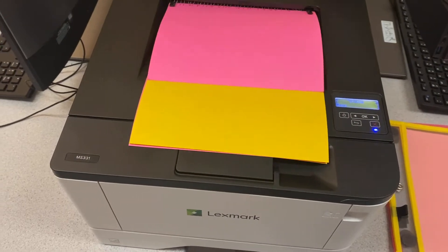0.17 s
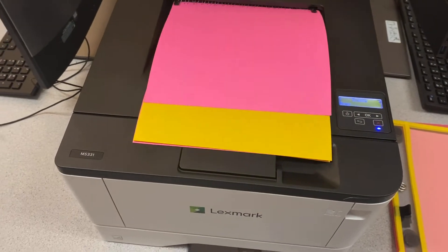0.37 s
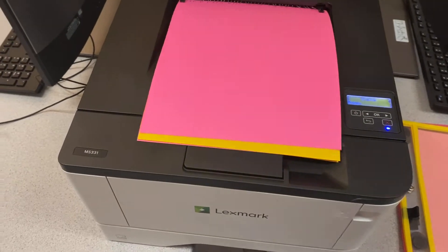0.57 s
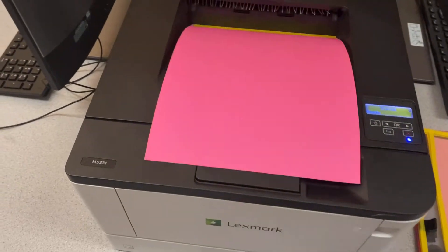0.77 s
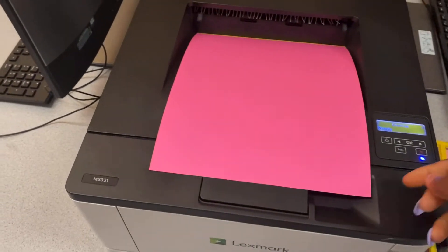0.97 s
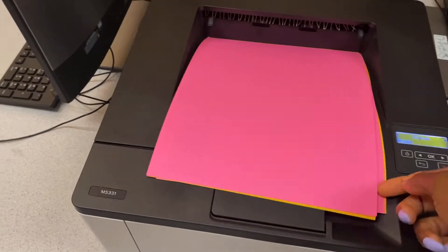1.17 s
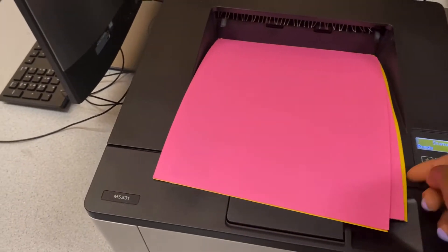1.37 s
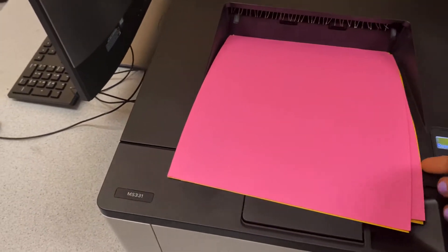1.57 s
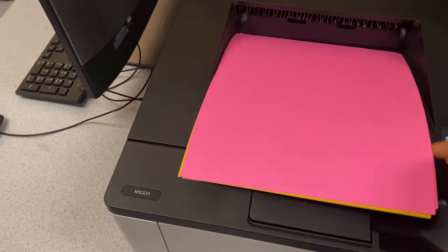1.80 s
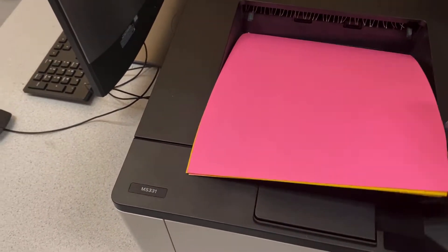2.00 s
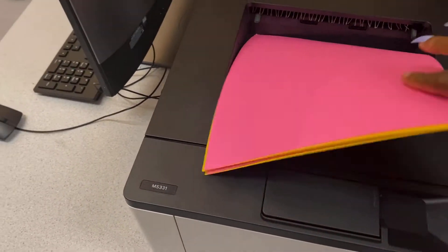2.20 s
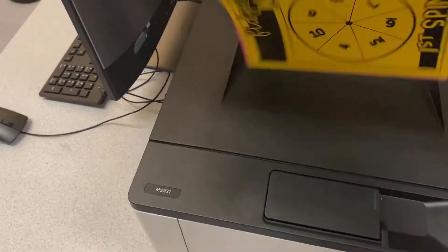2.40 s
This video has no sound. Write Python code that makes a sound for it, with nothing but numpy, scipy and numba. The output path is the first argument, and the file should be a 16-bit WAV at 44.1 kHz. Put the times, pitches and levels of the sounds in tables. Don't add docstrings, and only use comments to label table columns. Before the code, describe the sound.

A printer clunks twice, its motor coasts down with a thin whine, and sheets rustle and pop

```python
import sys
import numpy as np
from scipy import signal
from scipy.fft import rfft, irfft, next_fast_len
from scipy.io import wavfile
from scipy.ndimage import uniform_filter1d
from numba import njit

SR = 44100
rng = np.random.default_rng(int(sys.argv[2]) if len(sys.argv) > 2 else 0)


def invert_db(level):
    return 10 ** (np.asarray(level, dtype=float) / 20)


def log_audio(samples):
    frames = np.atleast_2d(samples).T
    limited = np.clip(frames, -1, 1)
    pcm = np.round(limited * 32767).astype(np.int16)
    wavfile.write(sys.argv[1], SR, pcm)


N = 107912
T = np.arange(N) / SR


def level(x, db):
    return x * invert_db(db) / np.sqrt(np.mean(x ** 2))


@njit
def svf(x, hz, width):
    y, b, l = np.empty(len(x)), 0., 0.
    g, k = np.tan(np.pi * hz / SR), width / hz
    for i in range(len(x)):
        v = (b + g * (x[i] - l)) / (1 + g * (g + k))
        b, l, y[i] = 2 * v - b, l + 2 * g * v, k * v
    return y


def resonance(x, hz, width):
    return svf(svf(x, 1. * hz, 1. * width), 1. * hz, 1. * width)


def decay(t, t60):
    return 1000. ** (-t / t60)


def walk(rate):
    k = int(SR / rate)
    steps = np.repeat(rng.standard_normal(N // k + 1), k)
    return 1.097 * uniform_filter1d(uniform_filter1d(steps, k), k)[:N]


def curve(table):
    return np.interp(T, [r[0] for r in table], [r[1] for r in table])


def on_hz(table, hz):
    return np.interp(np.log(hz + 1), np.log([r[0] for r in table]), [r[1] for r in table])


def bands(colour, flicker_db):
    f, out = np.arange(N // 2 + 1) * SR / N, 0
    spec = rfft(rng.standard_normal(N)) * invert_db(on_hz(colour, f)) * (f > 22) * (f < 15800)
    for k in range(-1, 19):
        share = np.clip(1 - abs(2 * np.log2((f + 1) / 30) - k), 0, 1)
        out = out + invert_db(flicker_db * walk(14.93)) * irfft(spec * share, N)
    return level(out, 0)


def wobble(hz, drift, flicker_db):
    phase = 2 * np.pi * hz * np.cumsum(1 + drift * walk(8.27)) / SR
    return invert_db(flicker_db * walk(12.27)) * np.sin(phase)


def ring(modes, t):
    longest_s = .08
    return sum((-1) ** k * invert_db(db) * np.sin(2 * np.pi * hz * t) * decay(t, min(t60, longest_s))
               for k, (hz, db, t60) in enumerate(modes))


def flex(t, end_hz, t60):
    start_ratio, glide_s = 2.15, 0.0013
    hz = end_hz * (1 + (start_ratio - 1) * np.exp(-t / glide_s))
    return np.sin(2 * np.pi * np.cumsum(hz) / SR) * decay(t, t60)


def add(out, t, x):
    i = max(int(t * SR), 0)
    out[i:i + len(x)] += x[:N - i]


def clunks():
    # start_s, level_db, crack_length_s, tail_db
    strikes = [
        (.048, -22, 0.0093, -9),
        (0.2083, -17, 0.015, -3.5),
    ]
    # pitch_hz, level_db, t60_s
    body_a = [(140, -12.5, 0.033), (300, -10.5, 0.097), (763, -1, 0.049), (852, -2.5, 0.038),
              (1306, 0, 0.019), (1753, 2, 0.038), (3460, -37, 0.013), (5300, -19, 0.015)]
    body_b = [(86.5, -5, 0.11), (206, -7, 0.048), (300, 1, 0.097), (580, -7, 0.039), (800, 3, 0.03),
              (900, 1.5, 0.04), (1090, -5.5, 0.021), (1413, 8, 0.016), (1770, -5, .03),
              (2460, -14.5, 0.019), (5000, -16, 0.0091)]
    # delay_s, level_db, contact_s
    blows_a = [(.0006, 7, 0.0001), (.002, -4, 0.00016), (.0055, -6, .0002), (.0093, 0, 0.00048),
               (.0128, -5.5, 0.00022)]
    blows_b = [(.0006, -12, .0003), (.002, -8, 0.00017), (.0042, -1.5, 0.00012), (.006, -0.5, 0.000095),
               (.008, 5.5, 0.00064), (.0105, -3.5, .0002), (0.0136, -0.5, 0.00034), (0.0184, -7, 0.00034),
               (0.0217, -7, 0.00038), (0.028, -4.5, 0.00023), (.031, -7.5, 0.00041), (.0375, -6, .0006)]
    crack_late = (0., 0.003)
    tail_t60, crack_db, crack_hz = 0.16, 6, 5500.
    out, t = np.zeros(N), T[:SR // 3]
    for strike, modes, blows, late in zip(strikes, (body_a, body_b), (blows_a, blows_b), crack_late):
        at, db, rattle, tail_db = strike
        hits = sum((-1) ** k * invert_db(blow_db) * np.exp(-(2 * (t - delay) / contact) ** 2) / contact
                   for k, (delay, blow_db, contact) in enumerate(blows))
        body = svf(signal.fftconvolve(hits, ring(modes, t))[:len(t)], 550.0, 11000.0)
        crack = svf(rng.standard_normal(len(t)), crack_hz, 4900.0)
        crack = crack * np.exp(-t / (0.66 * rattle)) * np.clip((t - late) / 0.0013, 0, 1)
        tail = svf(rng.standard_normal(len(t)), 1140.0, 1300.0)
        tail = tail * decay(t, tail_t60) * np.clip(t / 0.0037, 0, 1)
        body = body / np.std(body[:int(rattle * SR)])
        add(out, at, invert_db(db) * (body + invert_db(crack_db) * crack + invert_db(tail_db) * 4.2 * tail))
    return out


def drive():
    # time_s, level_db
    effort = [(0, -41.5), (.2, -39.5), (.3, -40.5), (.45, -41.5), (.7, -44.5), (.85, -47.5), (.98, -52),
              (1.1, -51.5), (1.4, -56.5), (2.45, -61.5)]
    # pitch_hz, density_db_per_hz
    run_colour = [(80, -7), (200, -0.5), (650, -5.5), (1300, -6), (2600, -8.5), (4500, -18), (6300, -15.5),
                  (15500, -22.5)]
    # pitch_hz, width_hz, level_db
    case_modes = [(223, 24, -16), (300, 33, 2), (338, 26, -4), (593, 32, -8.5)]
    # pitch_hz, level_db
    mesh_tones = [(211, -6), (293, 0), (338, -4)]
    knocks_per_s, gears_off_s, gear_sag_db_s = 900, 0.98, -5
    chopper_hz, chopper_db, chopper_off_s = 12544, -64, .95

    knocks = (rng.random(N) < knocks_per_s / SR) * rng.standard_normal(N) * invert_db(3.5 * walk(34.5))
    case = sum(invert_db(db) * level(resonance(knocks, hz, 1.15 * width), 0) for hz, width, db in case_modes)
    mesh = sum(invert_db(db) * wobble(hz, .015, 2.8) for hz, db in mesh_tones)
    gears = invert_db(-41 + gear_sag_db_s * T) * (level(case, -4.5) + level(mesh, -7))
    gears = gears * np.clip((gears_off_s - T) / 0.063, 0, 1)

    sing_level = invert_db(chopper_db + 2.3 * walk(6.9) - 6 * (T < .3))
    sing = sing_level * np.sin(2 * np.pi * chopper_hz * T) * np.clip((chopper_off_s - T) / 0.018, 0, 1)
    running = invert_db(curve(effort)) * bands(run_colour, 1.73) * invert_db(.7 * walk(26.04))
    return running + gears + sing


def mirror_motor():
    # time_s, level_db
    whine = [(.3, -74), (.57, -66), (.63, -53), (.75, -53.5), (.92, -53.5), (1.05, -51), (1.3, -52),
             (1.44, -59), (1.53, -54), (1.6, -59.5), (1.66, -60.5), (1.8, -62), (1.9, -65.5), (2.05, -60.5),
             (2.25, -64), (2.44, -87)]
    mirror_hz, cut_s, coast_per_s = 2614, .935, .404
    brake, brake_s = .035, .07
    low_order, low_db = .4, -2
    pole_order, pole_db, pole_ring_hz, pole_ring_width_hz = 7.2, -12, 12800, 260

    since = np.maximum(T - cut_s, 0)
    hz = mirror_hz * np.exp(-coast_per_s * since - brake * (1 - np.exp(-since / brake_s)))
    turn = 2 * np.pi * np.cumsum(hz) / SR
    pole = invert_db(pole_db) / (1 + ((pole_order * hz - pole_ring_hz) / pole_ring_width_hz) ** 2)
    low = invert_db(low_db + 2.0 * walk(9.4)) * np.clip((1.25 - T) / .3, 0, 1)
    main = invert_db(curve(whine) + (1.2 + 1.2 * T) * walk(24))
    companions = low * np.sin(low_order * turn) + pole * np.sin(pole_order * turn)
    return np.sqrt(2) * (main * np.sin(turn) + invert_db(-58) * companions)


def ticks():
    # start_s, level_db, pitch_hz, width_hz, t60_s
    snaps = [(.042, -37, 1580, 500, 0.018), (0.171, -39.5, 6100, 8000, 0.045),
             (.594, -35.5, 2060, 348, 0.021), (.594, -44, 715, 300, 0.06), (0.6585, -37, 5450, 1500, 0.034),
             (.661, -37.5, 3800, 1800, 0.036), (.658, -41, 2660, 400, 0.064),
             (0.657, -37, 11500, 9000, 0.06), (0.673, -37, 1330, 500, 0.03), (.675, -34.5, 539, 108, 0.057),
             (.712, -47, 4480, 3000, 0.024), (0.729, -43.5, 5160, 700, 0.033), (1.186, -40.5, 330, 156, .1),
             (1.351, -55.5, 11500, 4050, 0.025), (1.969, -42.5, 1840, 2350, 0.02),
             (1.9695, -58, 11100, 12000, .012), (2.091, -42, 9600, 12200, 0.0071),
             (2.117, -44, 5500, 3930, 0.0071), (2.126, -39, 3800, 6000, 0.047),
             (2.148, -37.5, 9000, 12000, 0.0069), (2.148, -43, 1810, 1500, 0.0086),
             (.672, -44, 4500, 5030, 0.067), (.728, -45, 1980, 1500, 0.048), (.738, -48, 3100, 1800, 0.047),
             (.89, -46.5, 322, 109, 0.18), (0.2089, -17.5, 1024, 510, 0.034),
             (.0485, -24.5, 760, 250, 0.031), (.612, -44, 322, 200, 0.041), (1.508, -57.5, 3170, 900, .04),
             (2.234, -51.5, 9000, 8000, 0.015)]
    out, t = np.zeros(N), T[:SR // 6]
    for at, db, hz, width, t60 in snaps:
        push = rng.standard_normal(len(t)) * decay(t, t60)
        push[0] += 4.0
        x = resonance(push, hz, 1.03 * width)
        add(out, at, invert_db(db) * x / np.std(x[:int(t60 * SR / 4) + 20]))
    return out


def fingernail_snap():
    # start_s, level_db
    snap_at = (2.1248, -15.5)
    # pitch_hz, level_db, t60_s
    snap_modes = [(3470, -5, 0.01), (4880, 5, 0.0062), (6500, 12, 0.0025), (9000, -5, 0.011)]
    out, t = np.zeros(N), T[:SR // 3]
    snap = ring(snap_modes, t) + invert_db(7) * flex(t, 1253, .018)
    high_pass = signal.butter(2, 950, "high", fs=SR, output="sos")
    add(out, snap_at[0], -invert_db(snap_at[1]) * signal.sosfilt(high_pass, snap) / 2)
    return out


def pops():
    # start_s, level_db, end_pitch_hz, t60_s
    buckles = [(2.0912, -37.5, 800, 0.037), (2.097, -50, 1310, .015), (2.103, -48, 755, 0.016),
               (2.133, -33, 700, 0.027), (2.1478, -42, 800, 0.03), (2.1628, -29.5, 480, 0.02),
               (2.167, -43, 800, .015), (2.176, -29, 496, 0.016), (2.1805, -35, 710, 0.041),
               (2.1875, -31, 553, 0.022), (2.197, -37, 447, 0.033), (2.205, -43, 497, .025),
               (2.221, -41.5, 510, 0.026), (1.513, -44, 900, 0.015), (1.526, -44, 440, .03),
               (1.545, -46, 393, 0.063), (1.574, -45, 300, 0.089), (1.613, -41.5, 300, 0.13),
               (1.631, -35.5, 900, 0.012), (1.635, -38.5, 450, 0.063), (1.647, -39, 431, 0.065),
               (1.668, -41.5, 382, 0.033)]
    out, t = np.zeros(N), T[:SR // 15]
    for at, db, hz, t60 in buckles:
        add(out, at, invert_db(db) * flex(t, hz, t60))
    return out


def sheets():
    # centre_s, length_s, level_db, thump_hz, hiss_db
    strokes = [(1.034, 0.02, -46, 800, -9.5), (1.196, 0.059, -48.5, 474, -1.5),
               (1.362, 0.064, -55.5, 510, 0), (1.528, 0.094, -50, 560, -9),
               (1.626, 0.054, -48.5, 700, -5.5), (1.86, 0.054, -58.5, 1520, 8.5),
               (1.926, 0.042, -50.5, 324, -2.5), (2.125, 0.071, -48, 800, -4.5),
               (2.18, 0.057, -49, 680, -6.5), (2.187, 0.1, -43.5, 300, -24),
               (2.283, 0.094, -55.5, 900, -0.5), (2.324, 0.046, -57.5, 1090, 0.5),
               (2.35, .03, -55.5, 496, 5.5), (1.578, 0.057, -59, 490, -7.5), (2.239, 0.035, -59, 900, -1)]
    hiss_hz, hiss_width_hz, rustle_db = 2780., 7000., 3.5
    thump = rng.standard_normal(N) * invert_db(2.7 * walk(250))
    grain = rng.standard_normal(N) * invert_db(rustle_db * walk(260))
    hiss = level(svf(grain, hiss_hz, hiss_width_hz), 0)
    out = 0
    for at, length, db, hz, hiss_db in strokes:
        low = level(resonance(thump, hz, 1.63 * hz), 0)
        stroke = np.exp(-(2.47 * (T - at) / length) ** 2)
        out = out + invert_db(db) * stroke * (low + invert_db(hiss_db) * hiss)
    return out


def room():
    # pitch_hz, density_db_per_hz
    air_colour = [(30, -12), (60, 5.5), (125, -1.5), (280, -5.5), (630, -57), (1600, -23), (4000, -33),
                  (15500, -61)]
    hum_hz = 58.5
    hum = wobble(hum_hz, 0.025, 2.6) + invert_db(-6.5) * wobble(2 * hum_hz, 0.012, 1.2)
    idle = level(svf(rng.standard_normal(N), 320.5, 12.), -59) * invert_db(-5 * (T - 1.32))
    fan = level(svf(rng.standard_normal(N), 6970., 35.), -78)
    return invert_db(-54.5) * bands(air_colour, 2.5) + level(hum, -55) + fan + idle


def scene():
    mono = mirror_motor() + drive() + clunks() + fingernail_snap() + ticks() + pops() + sheets() + room()
    t = T[:SR // 40]
    smear = rng.standard_normal(len(t)) * np.exp(-t / 0.00085)
    diffuse = signal.fftconvolve(mono, smear / np.linalg.norm(smear))[:N]
    loose = svf(diffuse, 1600.0, 6300.0) * invert_db(-11)
    return np.array([mono + loose, mono - loose])


def top_cut(x):
    return signal.sosfilt(signal.butter(12, 16850, fs=SR, output="sos"), x)


def record(dry):
    # pitch_hz, lead_rad
    lead = [(0, 0), (800, .5), (1800, 0.05), (2700, .8), (5300, .2), (7000, 2.85), (14100, 9.7),
            (15900, 12.6)]
    # pitch_hz, left_minus_right_db
    balance = [(60, -1.3), (200, -3.5), (650, -7.5), (1300, -1.8), (2800, -3), (5000, -.5), (9000, 0)]
    top_hz, low_cut_hz, soft_clip = 16000, 31.4, .75
    size = next_fast_len(N + 4096)
    f = np.arange(size // 2 + 1) * SR / size
    lead_rad = np.interp(f, [r[0] for r in lead], [r[1] for r in lead])
    half = invert_db(on_hz(balance, f) / 2) * np.exp(.5j * lead_rad)
    top = 1 / (1 + (f / top_hz) ** 40)
    low_cut = f ** 4 / (f ** 4 + low_cut_hz ** 4)
    wet = irfft(rfft(dry, size) * np.array([half, 1 / half]) * top * low_cut, size)[:, :N]
    return top_cut(soft_clip * np.tanh(wet / soft_clip))


dry = scene()
out = record(dry)
log_audio(out)
```